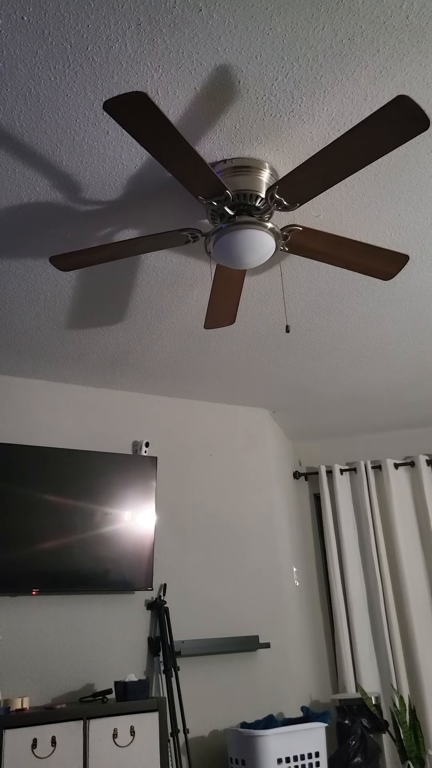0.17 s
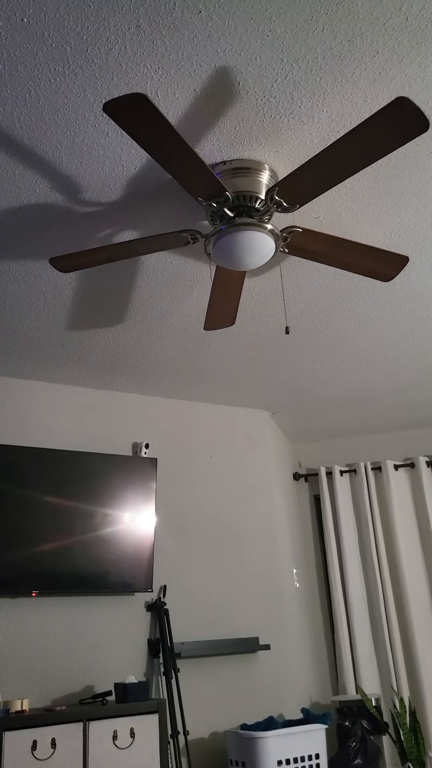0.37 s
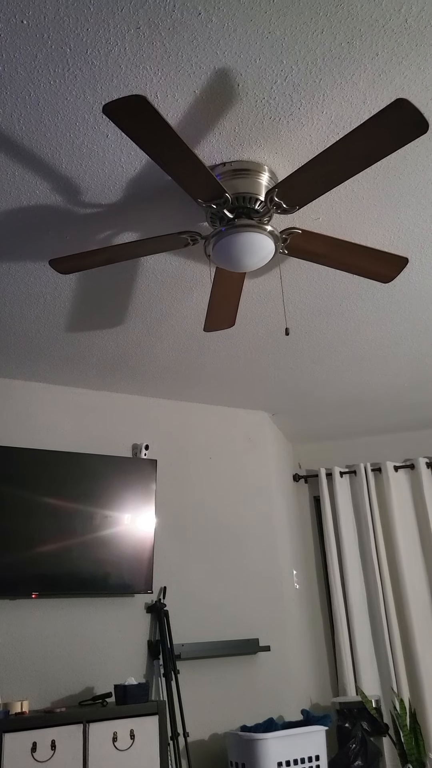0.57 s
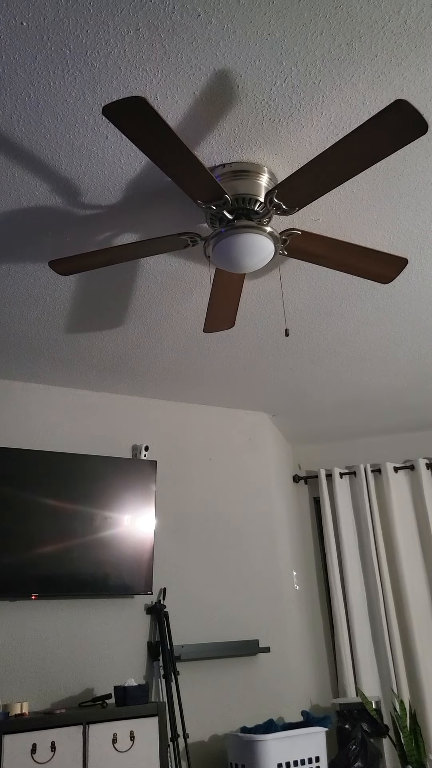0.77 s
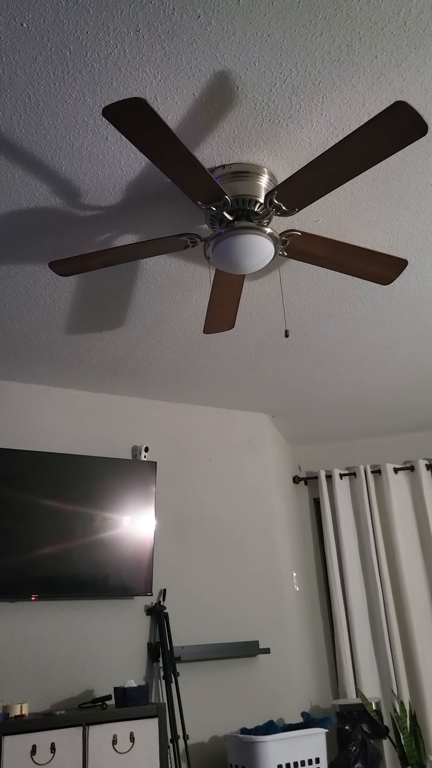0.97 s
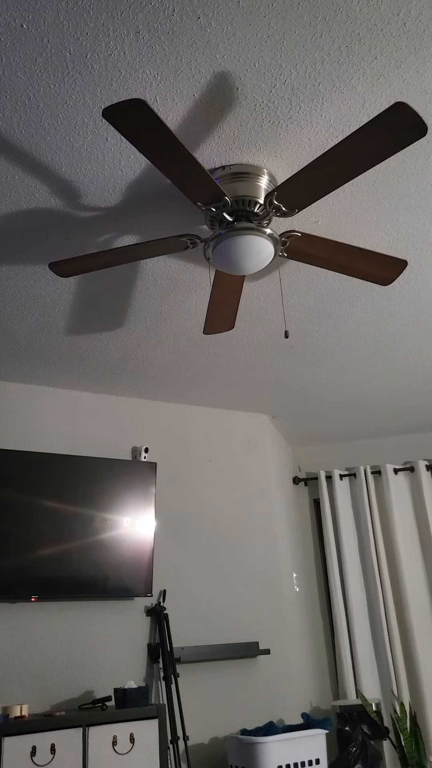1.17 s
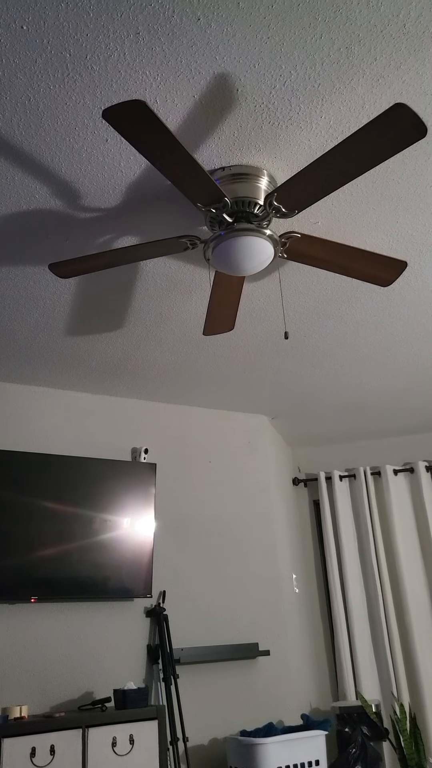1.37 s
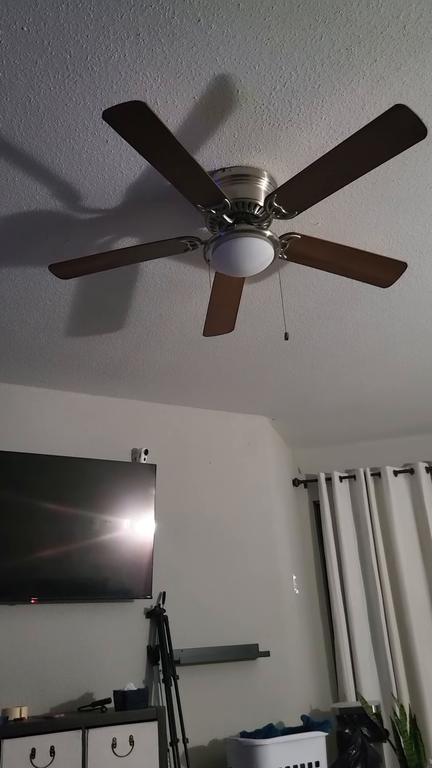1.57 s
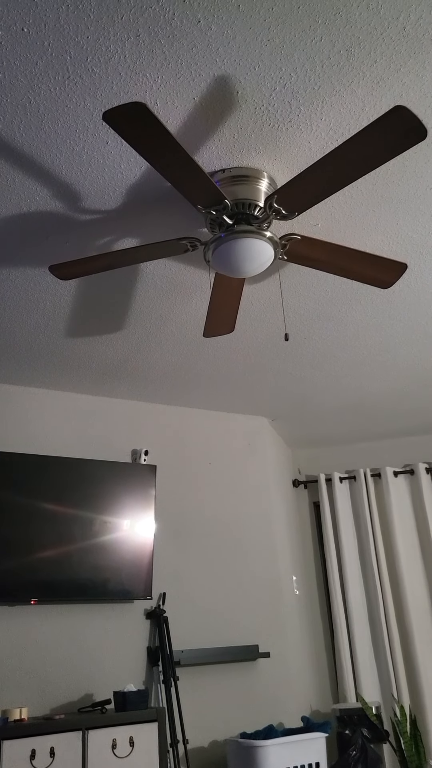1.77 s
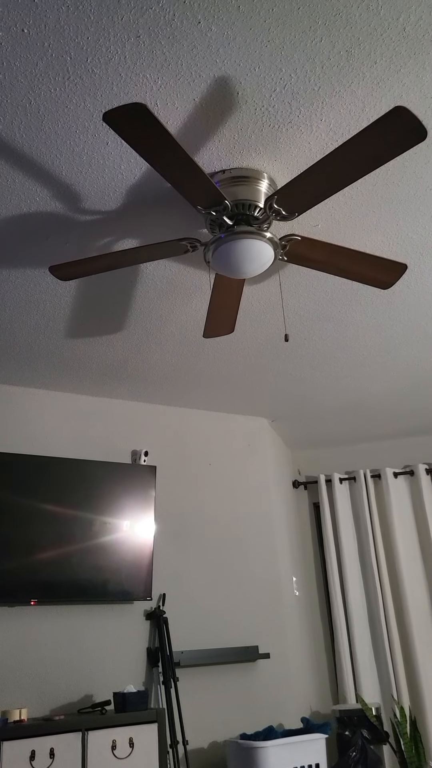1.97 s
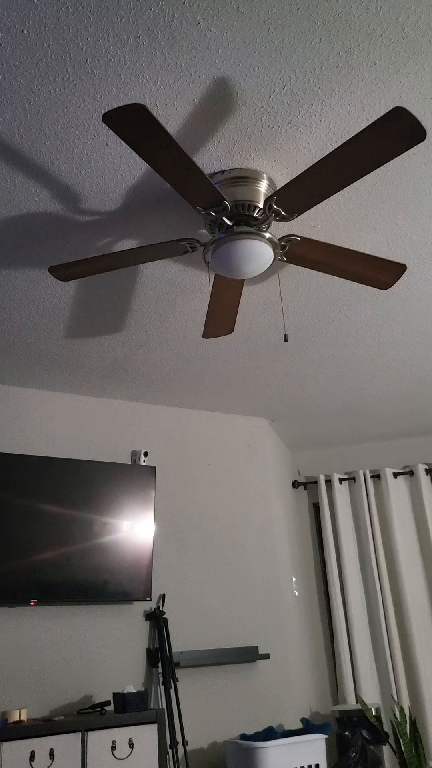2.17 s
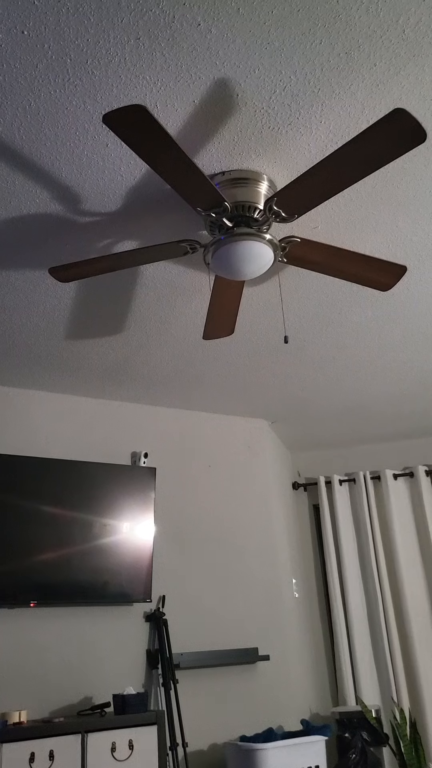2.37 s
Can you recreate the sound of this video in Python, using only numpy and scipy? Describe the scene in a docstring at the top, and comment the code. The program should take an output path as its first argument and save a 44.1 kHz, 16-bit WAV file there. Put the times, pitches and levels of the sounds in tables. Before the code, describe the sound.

Someone stomps overhead in a home at night; after a brief low rumble, five weighty thuds shake the ceiling at an even pace, each with softer after-thumps and knocks, some with crisp ticks, picked up in the room below.

```python
"""A quiet rumble, then five heavy steps on the floor above, about two a second, heard from the room below.
Sagging sines swing the ceiling at each heel; softer swings follow, and decaying joist modes rumble on.
Shaped noise knocks the boards, which ring low room modes; hard contacts add resonant woody raps.
The loaded ceiling cracks: a short noise snap plus a room tail with its own decay at each frequency."""
import sys
import numpy as np
from scipy import signal
from scipy.fft import rfft, irfft, next_fast_len
from scipy.io import wavfile

SR = 44100
rng = np.random.default_rng(int(sys.argv[2]) if len(sys.argv) > 2 else 0)


def bounce(signal):
    """Save signal as a 16-bit WAV file at the path given by the first command-line argument."""
    frames = np.transpose(np.atleast_2d(signal))
    limited = np.clip(frames, -1, 1)
    pcm = np.round(limited * 32767).astype(np.int16)
    wavfile.write(sys.argv[1], SR, pcm)


N = 110250


def amp(db):
    """Decibels to gain."""
    return 10 ** (np.asarray(db) / 20)


def along(points, hz):
    """(Hz, value) points interpolated on a log-frequency axis."""
    point_hz, value = np.transpose(points)
    return np.interp(np.log(hz + 1), np.log(point_hz + 1), value)


def ramp(u):
    """Sine-squared step from 0 to 1."""
    return np.sin(np.pi / 2 * np.clip(u, 0, 1)) ** 2


def since(start_s):
    """Seconds since start_s, zero before it."""
    return np.maximum(np.arange(N) / SR - start_s, 0)


def ring(t, t60_s):
    """Exponential decay, 60 dB down after t60_s."""
    return np.exp(-np.log(1000) * t / t60_s)


def noise(spectrum, alike, tilt_db_oct=0, peak_hz=1, peak_db=0, peak_octaves=1):
    """Stereo noise of rms 1: spectrum, tilt and one optional resonance; alike sets channel correlation."""
    hz = np.fft.rfftfreq(N, 1 / SR)
    octaves = np.log2(np.maximum(hz, spectrum[0][0]) / SR)
    off_peak = np.log2((hz + 1) / peak_hz) / peak_octaves
    resonance_db = peak_db / (1 + off_peak ** 2)
    gain = amp(along(spectrum, hz) + tilt_db_oct * octaves + resonance_db)
    # mid/side power split giving the wanted correlation
    angle = np.arccos(np.clip(along(alike, hz), -1, 1)) / 2
    white = rfft(rng.standard_normal((2, N)))
    mid, side = irfft(white * gain * [np.cos(angle), np.sin(angle)], N)
    pair = np.array([mid + side, mid - side])
    return pair / pair.std()


def dying(x, start_s, rise_s, t60, stretch=1, size=512):
    """Fades x in at start_s; each frequency then decays at its own rate, t60 times stretch."""
    hz, t, z = signal.stft(x, SR, nperseg=size)
    t60_s = stretch * along(t60, hz)[:, None]
    fade = amp(-60 * np.maximum(t - start_s, 0) / t60_s)
    faded = signal.istft(z * fade, SR, nperseg=size)[1][:, :N]
    return faded * ramp(since(start_s) / rise_s)


# heel stomps: t/s, level/dB, starting f/Hz, hold/s, release/s
STOMPS = [(0.215, -19, 62.8, 0.041, 0.014), (0.7027, -25, 67.4, 0.078, 0.075),
          (1.158, -29.5, 53.7, 0.032, 0.089), (1.6450, -24.5, 45.4, 0.045, 0.0081),
          (2.1205, -23, 46.5, 0.054, 0.024)]
# softer swings as the weight settles and lifts: t/s, level/dB, f/Hz, length/s
REBOUNDS = [(0.319, -42.5, 45, 0.1), (0.352, -30, 44.2, 0.079), (0.829, -33, 38, 0.06),
            (0.868, -32, 45.5, 0.077), (1.015, -41.5, 68.5, 0.046), (1.275, -37.5, 40.6, 0.083),
            (1.718, -34.5, 34.4, 0.13), (1.856, -40.5, 39, 0.038), (2.196, -23.5, 46.3, 0.055),
            (2.29, -36, 32, 0.098)]
SWELL_S, SAG_PER_S = 0.0089, 1.2  # build-up time constant; pitch sinks as the weight comes on


def heels():
    """Each heel swings the ceiling for a few cycles; softer swings follow as the weight shifts."""
    out = np.zeros(N)
    for start_s, db, hz, hold_s, release_s in STOMPS:
        t = since(start_s)
        cycles = hz * (1 - np.exp(-SAG_PER_S * t)) / SAG_PER_S
        swell = 1 - np.exp(-t / SWELL_S)
        release = ramp(1 - (t - hold_s) / release_s)
        out -= amp(db) * np.sin(2 * np.pi * cycles) * swell * release
    for start_s, db, hz, length_s in REBOUNDS:
        t = since(start_s)
        arch = np.sin(np.pi * np.minimum(t / length_s, 1))
        out -= amp(db) * np.sin(2 * np.pi * hz * t) * arch
    return out


MODE_RISE_S, MODE_SCATTER_DB = 0.016, 3


def struck(events, modes):
    """Each event rings all modes in proportion to its level, with random scatter in level and phase."""
    out = np.zeros(N)
    for start_s, event_db, *_ in events:
        t = since(start_s)
        scatter = rng.standard_normal((len(modes), 2))
        for (hz, db, t60_s), (size, turn) in zip(modes, scatter):
            gain = amp(event_db + db + MODE_SCATTER_DB * size)
            tone = np.sin(2 * np.pi * hz * t + np.pi * turn)
            out += gain * tone * ring(t, t60_s) * ramp(t / MODE_RISE_S)
    return out


# joist modes: f/Hz, level re stomp/dB, t60/s
JOIST_MODES = [(30.8, -18, 1), (39.13, -13, 0.51), (46.53, -13.5, .7), (58.55, -28, 1), (76.5, -18.5, 0.96),
               (94.4, -15, 0.63)]


def joists():
    """The joists ring on at their own modes after each stomp."""
    return struck(STOMPS, JOIST_MODES)


# board knocks: t/s, level before BOARDS_DB/dB, rise/s, t60 factor, tilt/(dB/octave)
KNOCKS = [(0.0, -52.5, 0.008, 0.52, 5), (0.225, -43, 0.014, 0.95, 1.5), (0.650, -39, 0.005, 1, -3.5),
          (0.705, -42.5, 0.0056, 0.75, 2), (0.774, -42.5, 0.018, 0.71, -0.5), (1.158, -44.5, 0.0044, .9, 1),
          (1.233, -48, 0.0073, 0.73, 4.5), (1.719, -40, 0.0083, 0.33, -2.5),
          (1.765, -43.5, 0.0096, 0.42, -3), (1.931, -44, 0.011, 1.0, -5.5), (2.133, -42, 0.0064, 0.54, -7),
          (2.199, -49, .008, 0.32, -0.5), (2.25, -48, 0.0025, 0.65, -4.5)]
# knock spectrum: f/Hz, relative level/dB
BOARD_SPECTRUM = [(40, -15.5), (85, -8.5), (125, 5), (165, 0), (215, 1.5), (247, -4), (285, -5),
                  (345, -7.5), (430, -11.5), (600, -21), (800, -30.5), (1600, -33.5), (3000, -61.5),
                  (8000, -92)]
# board decay: f/Hz, t60/s
BOARD_T60 = [(100, 1), (250, 0.39), (600, 0.65), (2000, 0.15)]
# left-right correlation of all noise but the snaps: f/Hz, correlation
ALIKE = [(60, 0.99), (130, 0.99), (260, 0.87), (400, .6), (700, .1), (2000, 0), (12000, 0.03)]
BOARDS_DB = -0.5


def boards():
    """Heel and sole knock on the boards; the ceiling lets mostly the low middle through."""
    out = np.zeros((2, N))
    for start_s, db, rise_s, stretch, tilt_db_oct in KNOCKS:
        thud = noise(BOARD_SPECTRUM, ALIKE, tilt_db_oct)
        out += amp(db) * dying(thud, start_s, rise_s, BOARD_T60, stretch)
    return amp(BOARDS_DB) * out


# low room modes: f/Hz, level re knock/dB, t60/s
ROOM_MODES = [(128.6, -13, 0.15), (160.8, -10, .65), (206, -13, 0.93), (221.2, -12.5, 0.49),
              (285, -15, 0.55)]


def room_modes():
    """The knocks set the low modes of the room ringing."""
    return struck(KNOCKS, ROOM_MODES)


# hard contacts: t/s, level/dB, f/Hz
RAPS = [(0.652, -47.5, 220), (1.168, -47, 475), (1.229, -58, 496), (1.752, -51.5, 215), (2.143, -49, 153.5),
        (2.159, -57.5, 464)]
# rap spectrum, before the resonance: f/Hz, relative level/dB
RAP_SPECTRUM = [(100, -13), (300, 4), (600, -2.5), (1200, -18), (2500, -26), (8000, -59)]
RAP_PEAK_DB, RAP_PEAK_OCTAVES, RAP_RISE_S, RAP_T60_S = 17.5, 0.25, 0.0027, 0.15


def raps():
    """A hard contact rings a single board: resonant noise with a short woody decay."""
    out = np.zeros((2, N))
    for start_s, db, hz in RAPS:
        t = since(start_s)
        wood = noise(RAP_SPECTRUM, ALIKE, 0, hz, RAP_PEAK_DB, RAP_PEAK_OCTAVES)
        out += amp(db) * wood * ramp(t / RAP_RISE_S) * ring(t, RAP_T60_S)
    return out


# ceiling cracks: t/s, level before pan/dB, tilt/(dB/octave), snap level before SNAP_DB/dB,
# resonance f/Hz, resonance height/dB, resonance half-width/octave
CRACKS = [(0.2098, -60.5, 4, -2, 3760, 12, .25), (0.237, -63.5, -1.5, -4.5, 3620, 5.5, 0.23),
          (0.284, -67, -3, 2, 3200, 6.5, 0.17), (0.330, -69.5, -7.5, -8, 2080, 11, 0.26),
          (0.655, -71, 2, -11, 2200, 0, .2), (0.7115, -51, -1.5, -0.5, 3200, 3, 0.41),
          (0.7186, -64, -3, 5, 3720, 6, 0.51), (0.736, -58.5, -3.5, -6, 2050, 3.5, 0.18),
          (1.153, -67, 6, -2, 4100, -3.5, 0.085), (1.1684, -49, -1.5, 0, 2880, 5.5, 0.13),
          (1.708, -80, 3, 4.5, 7400, 10, 0.067), (1.7155, -64.5, -8.5, 3, 3260, 2.5, 0.26),
          (1.738, -74, -8.5, 6, 2060, 17.5, 0.061), (2.128, -70, -6.5, -5.5, 2650, 6, 0.21),
          (2.159, -76.5, -6.5, 1, 2184, 8.5, .2)]
# room-tail spectrum: f/Hz, relative level/dB
TAIL_SPECTRUM = [(200, -30), (600, -4), (1000, -3.5), (1550, -7), (2000, 0), (2800, -2), (4000, -8),
                 (5200, -16.5), (6500, -19), (7600, -11), (8400, -50), (12000, -31.5), (15500, -36)]
# direct-snap spectrum: f/Hz, relative level/dB
SNAP_SPECTRUM = [(300, -6.5), (1000, -5.5), (1600, -5.5), (3000, 6), (4300, 4.5), (6000, -2), (7600, -0.5),
                 (8600, -20), (12000, -15), (15500, -26)]
# room decay: f/Hz, t60/s
ROOM_T60 = [(300, 0.81), (1300, 0.51), (2200, .55), (3000, 0.6), (4000, 0.51), (5000, 0.61), (7500, 0.48),
            (12000, 0.66)]
# left-right correlation of the snap: f/Hz, correlation
SNAP_ALIKE = [(500, .6), (8000, .4)]
SNAP_DB, SNAP_T60_S, SNAP_RISE_S = 7, 0.042, 0.0028
ROOM_RISE_S, CRACK_PAN_DB = 0.019, 1.7


def cracks():
    """The loaded ceiling snaps, each spot at its own pitch, a little to the left, and the room answers."""
    out = np.zeros((2, N))
    for start_s, db, tilt_db_oct, direct_db, *resonance in CRACKS:
        t = since(start_s)
        snap = noise(SNAP_SPECTRUM, SNAP_ALIKE, tilt_db_oct, *resonance)
        snap = snap * ramp(t / SNAP_RISE_S) * ring(t, SNAP_T60_S)
        tail = noise(TAIL_SPECTRUM, ALIKE, tilt_db_oct, *resonance)
        tail = dying(tail, start_s, ROOM_RISE_S, ROOM_T60)
        out += amp(db) * (amp(SNAP_DB + direct_db) * snap + tail)
    return out * amp([[CRACK_PAN_DB], [-CRACK_PAN_DB]])


# background spectrum: f/Hz, relative level/dB
BACKGROUND_SPECTRUM = [(20, -5), (32, -12), (53, 2), (112, -18), (175, -19.5), (205, -15.5), (288, -23),
                       (322, -16.5), (360, -26.5), (414, -28), (645, -35.5), (950, -40), (1350, -42.5),
                       (1650, -48), (3000, -55.5), (4300, -58.5), (5000, -66), (6800, -67.5), (7500, -56.5),
                       (8200, -76), (11500, -68), (15300, -69.5)]
BACKGROUND_DB = -49.5  # rms


def background():
    """Steady noise, mostly low rumble."""
    return amp(BACKGROUND_DB) * noise(BACKGROUND_SPECTRUM, ALIKE)


BASS_LEAD_S, BASS_PAN_DB = 0.00014, 0.32


def scene():
    """Sums the layers; swings and modes reach the left ear first and slightly louder."""
    bass = heels() + joists() + room_modes()
    t = since(0)
    late = np.interp(t - BASS_LEAD_S, t, bass)
    deep = np.array([bass, late]) * amp([[BASS_PAN_DB], [-BASS_PAN_DB]])
    return deep + boards() + raps() + cracks() + background()


TOP_HZ = 15500


def record(dry):
    """Brick-wall low-pass at TOP_HZ, zero-padded against wrap-around."""
    m = next_fast_len(N + SR // 2)
    passband = np.fft.rfftfreq(m, 1 / SR) < TOP_HZ
    return irfft(rfft(dry, m) * passband, m)[:, :N]


dry = scene()
out = record(dry)
bounce(out)
```